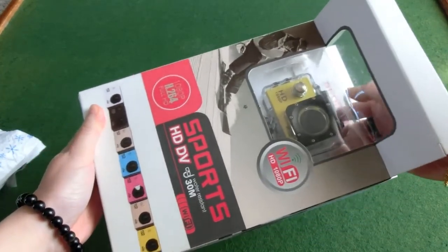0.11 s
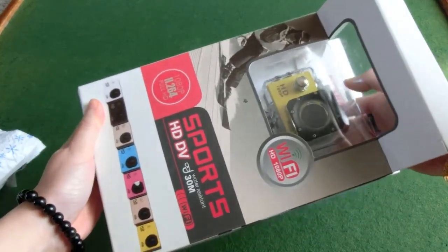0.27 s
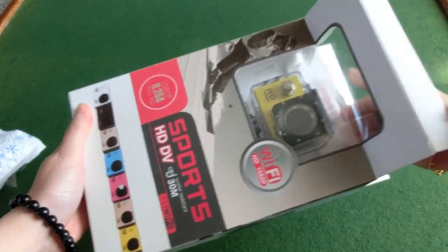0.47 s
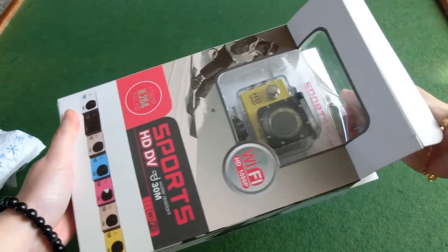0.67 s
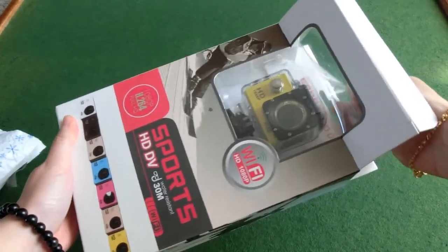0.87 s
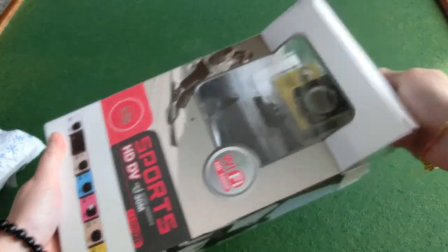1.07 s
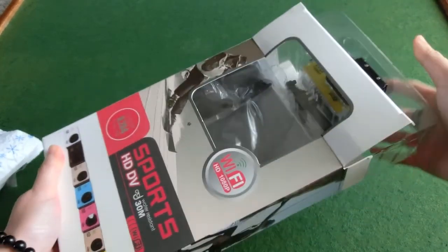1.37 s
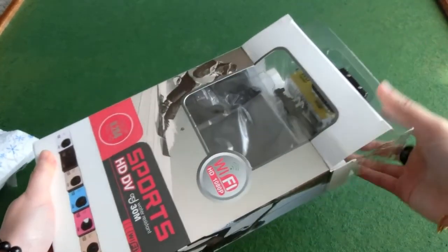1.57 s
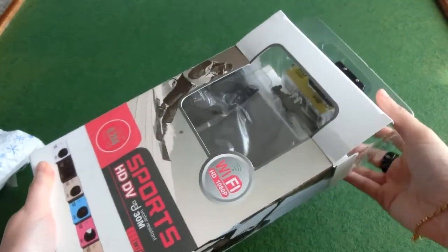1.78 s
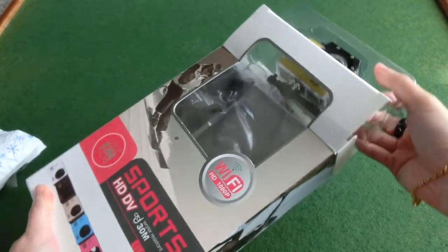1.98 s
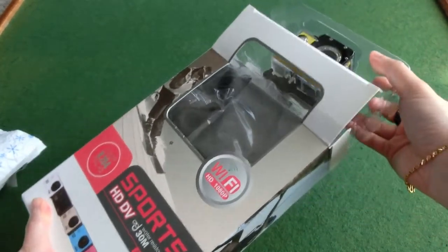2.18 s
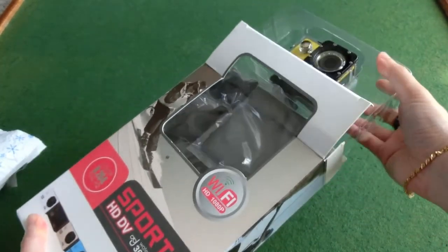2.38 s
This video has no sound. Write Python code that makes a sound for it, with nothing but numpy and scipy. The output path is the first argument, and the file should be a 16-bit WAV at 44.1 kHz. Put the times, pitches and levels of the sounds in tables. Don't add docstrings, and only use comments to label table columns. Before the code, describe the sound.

Sharp plastic buckling pops with boxy cardboard knocks, light scraping and small squeaks in a quiet room

```python
import sys
import numpy as np
from scipy import signal
from scipy.fft import rfft, irfft
from scipy.io import wavfile
from scipy.ndimage import uniform_filter1d

SR = 44100
rng = np.random.default_rng(int(sys.argv[2]) if len(sys.argv) > 2 else 0)


def int16_out(signal):
    q = np.round(np.clip(np.atleast_2d(signal).T, -1, 1) * 32767)
    wavfile.write(sys.argv[1], SR, q.astype(np.int16))


def attenuation_scalar(level_db):
    decades = np.asarray(level_db, float) / 20
    return 10 ** decades


N = 112455


def level(x, db):
    return x * attenuation_scalar(db) / np.sqrt(np.mean(x ** 2))


def peak(x):
    return x / np.abs(x).max()


def read(table, hz):
    points = np.array(table)
    return np.interp(np.log(hz), np.log(points[:, 0]), points[:, 1])


def band(x, lo_hz, hi_hz):
    return signal.sosfilt(signal.butter(2, [lo_hz, hi_hz], "bandpass", fs=SR, output="sos"), x)


def ring(hz, t60, t):
    return np.sin(2 * np.pi * hz * t) * np.exp(-np.log(1000) * t / t60)


def add(out, s, x):
    i = int(s * SR)
    out[i:i + len(x)] += x[:len(out) - i]


def walk(rate):
    k = int(SR / rate)
    held = np.repeat(rng.standard_normal(N // k + 1), k)
    return 1.125 * uniform_filter1d(held, k)[:N]


# f/Hz, density/dB per Hz
AIR_COLOUR = [(12, -27.5), (20, 10.5), (233, 1.5), (396, 7), (994, -7.5), (1390, -6.5), (3210, -15.5),
              (10900, -18), (15700, -30)]


def air():
    hz = np.maximum(np.fft.rfftfreq(N, 1 / SR), 10)
    mid, side = rfft(rng.standard_normal((2, N))) * attenuation_scalar(read(AIR_COLOUR, hz))
    side = side * np.clip(hz / 9000 + 8 / hz, .04, 1)
    return level(irfft(np.array([mid + side, mid - side]), N), -60)


# f/Hz, T60/s
ROOM_DECAY = [(150, 0.15), (500, 0.25), (1400, 0.37), (3700, 0.35), (10000, 0.39)]
ROOM_DB, ROOM_GAP_S, ROOM_WIDTH, ROOM_TILT_DB = -15, 0.0045, 0.38, -1.46


def room(x):
    t, tail = np.arange(30000) / SR, 0
    for hz in 90 * 2 ** np.arange(0, 7.6, .5):
        mid, side = band(rng.standard_normal((2, len(t))), hz / 1.19, min(hz * 1.19, 20000))
        width = min(ROOM_WIDTH * (hz / 4000) ** 2.5 + 0.07, 1)
        both = mid + width * side * np.array([[1], [-1]])
        tail = tail + both * attenuation_scalar(-60 * t / read(ROOM_DECAY, hz) + ROOM_TILT_DB * np.log2(hz / 1500))
    tail = tail * np.clip(t / ROOM_GAP_S, 0, 1) ** 2
    tail = attenuation_scalar(ROOM_DB) * tail / np.sqrt(np.mean(np.sum(tail ** 2, axis=1)))
    return signal.fftconvolve(x[None], tail, axes=1)[:, :N]


# f/Hz, density/dB per Hz
CARD_COLOUR = [(60, -24.5), (200, -6), (400, -0.5), (1300, -9), (2500, -13), (6000, -22), (11000, -28.5),
               (15500, -26.5)]
# t/s, length/s, level/dB, tilt/dB per octave
SCRAPE_STROKES = [(-.1, 0.67, -52, 1), (0.234, 0.048, -62, -9), (0.294, 0.029, -42.5, 1),
                  (0.321, 0.12, -47, 2.5), (0.543, 0.064, -42.5, 0.5), (0.651, 0.051, -52, 2.5),
                  (0.679, 0.096, -50.5, 1), (0.771, 0.18, -53, 1.5), (0.97, 0.069, -50.5, 3.5),
                  (1.027, 0.14, -41, 2.5), (1.095, 0.085, -42, 1), (1.139, 0.025, -33.5, -2.5),
                  (1.156, 0.12, -38.5, 0.5), (1.291, 0.098, -45, 1.5), (1.365, 0.075, -50, 0.5),
                  (1.429, 0.085, -63, 4), (1.577, 0.12, -54, 0.5), (1.74, 0.045, -51, 0),
                  (1.788, 0.091, -65, 2), (1.918, 0.076, -45, 1), (1.982, 0.14, -50, 1.),
                  (2.245, 0.06, -50, 1.5), (2.296, 0.086, -41.5, 1.5), (2.361, 0.092, -52, -2),
                  (2.444, 0.076, -45.5, 2), (2.474, 0.12, -47, -0.5)]
GRIT_PER_S, GRIT_DB, FLICKER_DB = 150, 5, 1


def scrape():
    t = np.arange(N) / SR
    grit = (rng.random(N) < GRIT_PER_S / SR) * attenuation_scalar(GRIT_DB * rng.exponential(size=N))
    grit = np.sqrt(1 + signal.lfilter([1], [1, -.97], grit))
    swells = [np.sin(np.pi * np.clip((t - s) / length, 0, 1) ** .55) for s, length, _, _ in SCRAPE_STROKES]
    out, power, shared = 0, 0, walk(90)
    for hz in 70 * 2 ** np.arange(0, 7.6, .5):
        x = attenuation_scalar(read(CARD_COLOUR, hz)) * band(rng.standard_normal(N) * grit, hz / 1.19, hz * 1.19)
        power += np.mean(x ** 2)
        force = 0
        for (_, _, db, tilt), swell in zip(SCRAPE_STROKES, swells):
            force = force + attenuation_scalar(db + tilt * np.log2(hz / 1500)) * swell
        out = out + x * force * attenuation_scalar(FLICKER_DB * (walk(29.83) + shared))
    return out / np.sqrt(power)


# t/s, length/s, first f/Hz, last f/Hz, level/dB
EDGE_SQUEAKS = [(.806, .044, 2900, 2930, -53), (.705, .035, 1400, 1300, -54),
                (1.004, .052, 3300, 3230, -48), (.998, .034, 5600, 5350, -54),
                (1.04, .038, 5500, 5150, -41), (1.047, .032, 11000, 10500, -46),
                (1.082, .022, 5200, 5250, -51), (1.10, .018, 2500, 2500, -45),
                (1.105, .028, 2800, 3000, -44), (1.10, .03, 3950, 4000, -50), (1.10, .034, 8600, 8700, -49),
                (1.26, .04, 1350, 1400, -53), (1.405, .035, 520, 470, -52)]
SQUEAK_WIDTH = .035


def squeaks():
    out = np.zeros(N)
    rough, drift, noise = walk(500), walk(200), rng.standard_normal(N)
    for s, length, hz, end_hz, db in EDGE_SQUEAKS:
        i, n = int(s * SR), int(length * SR)
        pitch = np.linspace(hz, end_hz, n) * (1 + .008 * drift[i:i + n])
        tone = attenuation_scalar(2.5 * rough[i:i + n]) * np.sin(2 * np.pi * np.cumsum(pitch) / SR)
        smear = band(noise[i:i + n], hz * (1 - SQUEAK_WIDTH), hz * (1 + SQUEAK_WIDTH))
        add(out, s, attenuation_scalar(db) * (tone + level(smear, -4)) * np.hanning(n) ** .3)
    return out


# f/Hz, level/dB
BOX_MODES = [(200, -6), (330, -12), (570, 0), (700, -6.5), (830, 3.5), (1190, 4.5), (1520, 1.5)]
PUSH_S, THUD_DB, RING_CYCLES = 0.0039, -31, 17
RATTLE_DB, RATTLE_S = 4, .003


def strike_box(rows):
    out, t = np.zeros(N), np.arange(8192) / SR
    chance = rng.standard_normal((len(rows), 620))
    u = t[:600] / PUSH_S
    thud = attenuation_scalar(THUD_DB) * ring(65, 0.091, t) * np.minimum(t / .004, 1)
    for (s, db, hz, ms, box_db), c in zip(rows, chance):
        ragged = c[20:]
        push = (0.083 * ragged + (np.arange(600) == 30)) * u ** 0.29 * np.exp(-u)
        panel = ring(hz, ms / 1000, t) + 0.13 * ring(hz * (1.1 + 0.07 * c[19]), ms / 2000, t)
        box = 0
        for k, (f, g) in enumerate(BOX_MODES):
            t60 = RING_CYCLES / np.sqrt(f * 900)
            box = box + attenuation_scalar(g + 1.3 * c[k]) * ring(f * (1 + 0.045 * c[8 + k]), t60, t)
        rattle = attenuation_scalar(RATTLE_DB * np.interp(t / RATTLE_S, np.arange(600), ragged))
        body = (panel + attenuation_scalar(box_db) * box) * rattle
        x = band(signal.fftconvolve(push, body)[:8192], 100 + hz / 4, 3 * hz)
        add(out, s, attenuation_scalar(db) * (peak(x) + thud))
    return out


# t/s, peak level/dB, f/Hz
WALL_CREAKS = [(.059, -48, 2650), (.108, -43.5, 2540), (.701, -46, 3860), (.715, -41.5, 3500),
               (.797, -36, 2190), (1.092, -33, 3000), (1.19, -30, 2530), (1.298, -40, 1480),
               (1.305, -36, 1450), (1.315, -43, 3220), (1.318, -40, 2320), (1.322, -36, 1390),
               (1.324, -56, 650), (1.340, -33.5, 1500), (1.354, -36, 1400), (1.381, -39, 1670),
               (1.90, -34, 2470), (1.903, -40.5, 3610), (1.929, -39, 2490), (1.73, -43.5, 1250),
               (1.985, -31.5, 1337), (2.018, -54, 4830), (2.305, -33, 950), (2.325, -37, 1270),
               (2.335, -32.5, 1000), (2.346, -39, 1300), (2.381, -36, 1300), (2.476, -49, 1400),
               (2.5, -44, 1420)]


def creaks():
    ring_ms, box_db = 15, -18.5
    return strike_box([row + (ring_ms, box_db) for row in WALL_CREAKS])


# t/s, peak level/dB, panel f/Hz, ring/ms, share of the whole box/dB
BOX_KNOCKS = [(0.2304, -16, 503, 17, -6.5), (.263, -27, 1010, 26, -2), (.323, -19, 823, 48, -29),
              (.322, -24.5, 225, 30, 1), (.339, -29, 500, 16, -8), (0.354, -23, 230, 125, 1),
              (.355, -33, 492, 50, -19), (0.441, -13.5, 740, 21, -6), (.442, -20, 357, 70, -16),
              (.4582, -13, 1270, 3.1, -20), (0.46, -15.5, 307, 33, -1.5), (.468, -26, 810, 13, -22),
              (.565, -30.5, 584, 140, 1.5), (.654, -35, 1220, 28, 1.5), (0.701, -34.5, 1288, 35, -9),
              (0.961, -18, 644, 45, -4.5), (.990, -24, 696, 57, -5), (1.057, -28, 850, 40, 5),
              (1.123, -32, 340, 69, -15), (1.139, -22, 585, 24, 12), (1.172, -18.5, 440, 42, -2),
              (1.338, -35, 484, 35, -21), (1.383, -26.5, 485, 43, -10.5), (1.392, -28.5, 475, 55, -17),
              (1.378, -34, 311.5, 23, -10.5), (1.586, -38, 320.6, 58, 0), (1.729, -37, 255, 55, -2),
              (1.755, -39.5, 505, 44, -7), (1.899, -25.5, 1147, 25, 1.5), (1.898, -30, 400, 32, 5.5),
              (1.929, -28, 1170, 18.5, -3), (1.987, -31.5, 740, 35, -14), (1.995, -36, 470, 38, -8.5),
              (2.281, -15, 756, 21, -6), (2.29, -21, 433, 61, -1), (2.380, -32, 687, 31, -8),
              (2.465, -32, 243, 32, -15), (2.467, -27, 1400, 26, -11), (2.498, -27.5, 602, 31, -3)]


def knocks():
    return strike_box(BOX_KNOCKS)


SNAP_MS, RING_DB, TRAY_T60_S = 2.32, -1, .0025
SETTLE_DB, SETTLE_T60_S = -34, 0.13


def buckle(rows):
    out, t = np.zeros(N), np.arange(8192) / SR
    u = t * 1000 / SNAP_MS
    chance = rng.standard_normal((len(rows), 3, 8192))
    for (s, db, top_db, hz), c in zip(rows, chance):
        ragged = np.repeat(c[1], 12)[:8192]
        burst = c[0] * attenuation_scalar(5.1 * ragged) * np.minimum(u / 0.27, 1) * np.exp(-1.6 * u ** 0.78)
        tones = rfft(burst)
        even = irfft(tones / uniform_filter1d(np.abs(tones), size=70))
        burst = peak(even * np.minimum(u / .2, 1) * np.exp(-(u / 3) ** 2))
        rustle_db = SETTLE_DB - 60 * t / SETTLE_T60_S + 1.5 * np.repeat(c[1], 90)[:8192]
        settle = c[2] * attenuation_scalar(rustle_db) * np.minimum(t / 0.002, 1)
        tray = ring(hz, TRAY_T60_S, t) + .5 * ring(hz * (1.6 + 0.52 * c[1, 0]), TRAY_T60_S, t)
        rung = signal.fftconvolve(burst, tray)[:8192]
        mid = band(burst + settle + attenuation_scalar(RING_DB) * peak(rung), 990, 7900)
        top = band(burst + settle, 3000, 11500)
        add(out, s, attenuation_scalar(db) * (peak(mid) + attenuation_scalar(top_db + 7) * peak(top)))
    return out


# t/s, peak level/dB, treble share/dB
TRAY_CRINKLES = [(.263, -32.5, -11.5), (0.345, -33.5, -6), (0.654, -39.5, -11), (0.701, -38.5, -7),
                 (1.305, -44.5, -3), (1.342, -44.5, -5.5), (1.382, -44.5, 1), (1.582, -38.5, -11),
                 (1.618, -49, 2.5), (1.730, -53.5, 0.5), (1.776, -54, 3.5), (2.019, -47.5, 2.5),
                 (2.157, -61.5, 9.5), (2.168, -45.5, -0.5), (2.2195, -36.5, -1.5), (2.2385, -48.5, 8.5),
                 (2.479, -37, -2.5), (2.501, -43.5, 0.5)]


def crinkles():
    return buckle([row + (3500,) for row in TRAY_CRINKLES])


# t/s, peak level/dB, treble share/dB, ring f/Hz
TRAY_SNAPS = [(.2318, -24, -3.5, 2640), (.2358, -25, -13, 2947), (.3222, -18.5, -3.5, 5220),
              (.3297, -20.5, -14.5, 2320), (.4428, -4.5, -17.5, 2700), (.4582, 1.5, -9, 4160),
              (.4586, -1, -9, 6200), (.4434, -6, -20, 5730), (2.2815, -22.5, -17.5, 4380),
              (.4690, -24.5, -9.5, 3500), (.9607, -22, -19.5, 3500), (.9893, -28.5, -15.5, 1798),
              (1.0575, -24, -24.5, 3400), (1.1379, -14, -11, 4200), (1.1415, -23.5, -12, 2340),
              (1.1718, -16.5, -4, 2800), (1.8990, -31, -2.5, 1620), (1.9288, -24.5, -14.5, 5170),
              (1.9791, -37, -2.5, 2000), (1.9856, -36, 6, 1460), (2.2572, -36.5, 5.5, 4950),
              (2.2638, -25.5, -9, 5050), (2.2811, -7, -16.5, 2350), (2.2898, -14.5, -18, 3030),
              (2.4665, -25.5, 0.5, 4800), (.798, -44.5, -12, 2210)]


def snaps():
    return buckle(TRAY_SNAPS)


PORT_LAG_S, SCATTER_DB, SCATTER_S = .000009, -5, .0015


def ports(near):
    turn = np.exp(-1j * np.pi * np.fft.rfftfreq(N, 1 / SR) * PORT_LAG_S)
    direct = irfft(rfft(near) * np.array([turn, 1 / turn]), N)
    glints = rng.standard_normal(400) * np.exp(-np.arange(400) / SR / SCATTER_S)
    glints = glints / np.sqrt(np.sum(glints ** 2))
    scatter = band(signal.fftconvolve(near, glints)[:N], 7500, 19000) * attenuation_scalar(SCATTER_DB)
    shake = band(near, 25, 120) * np.array([[1.2], [.8]])
    return direct + scatter * np.array([[1], [-1]]) + shake - band(near, 27, 110)


def scene():
    near = scrape() + squeaks() + creaks() + knocks() + crinkles() + snaps()
    return air() + room(near) + ports(near)


def top_cut(x):
    return signal.sosfilt(signal.butter(12, 15880, fs=SR, output="sos"), x)


def record(dry):
    top_hz, clip = 15800, 1.05
    x = signal.sosfilt(signal.ellip(8, .2, 50, top_hz, fs=SR, output="sos"), dry)
    return top_cut(np.clip(x, -clip, clip))


dry = scene()
out = record(dry)
int16_out(out)
```